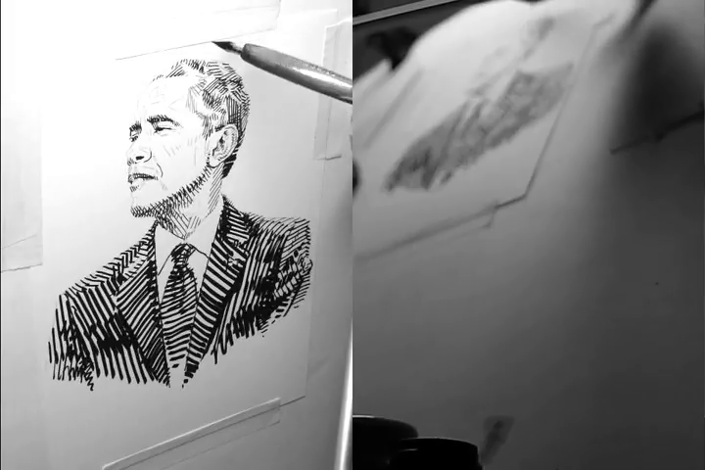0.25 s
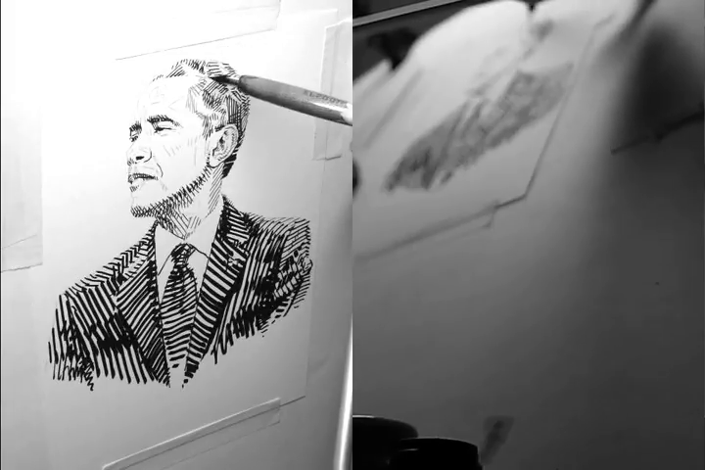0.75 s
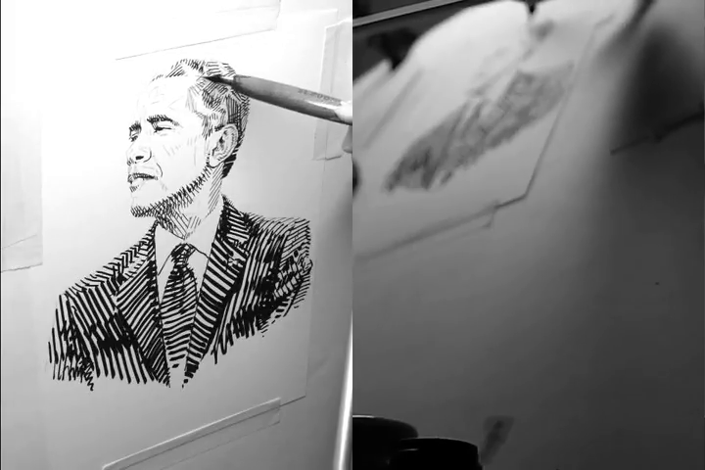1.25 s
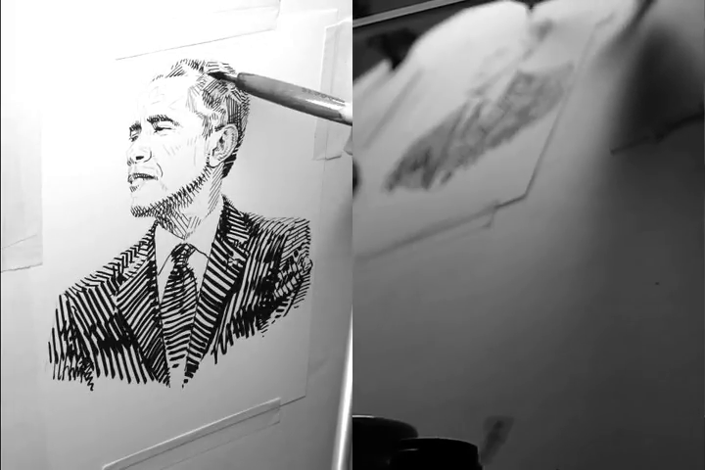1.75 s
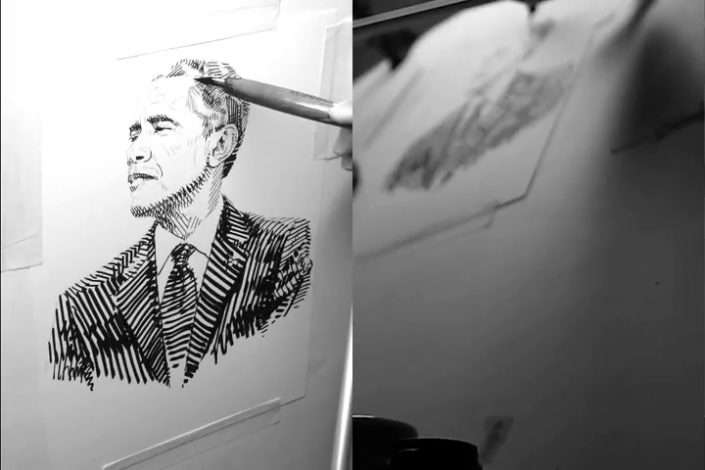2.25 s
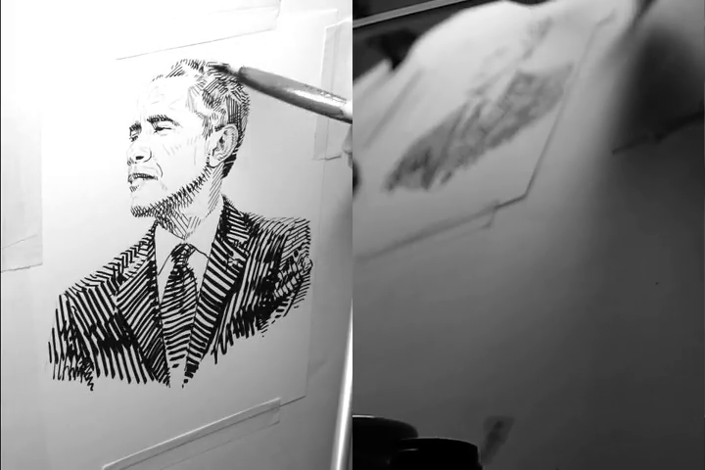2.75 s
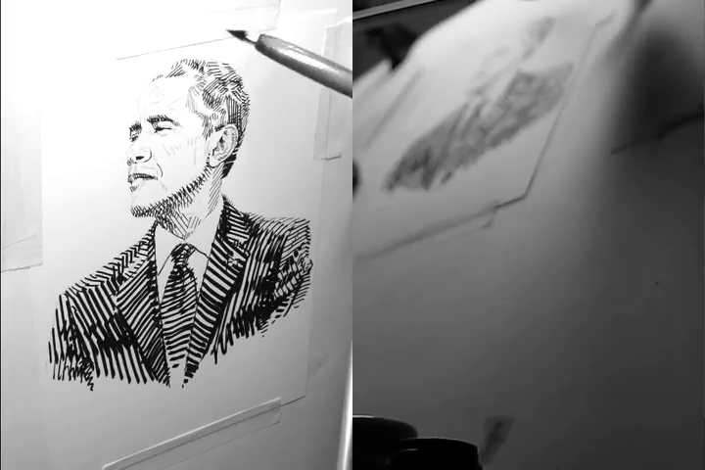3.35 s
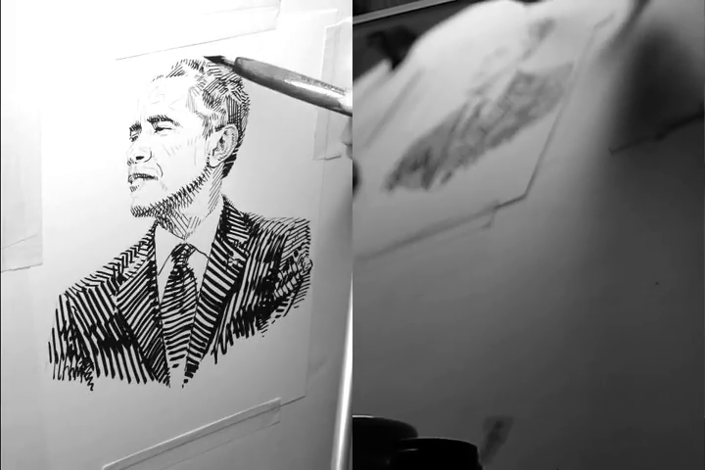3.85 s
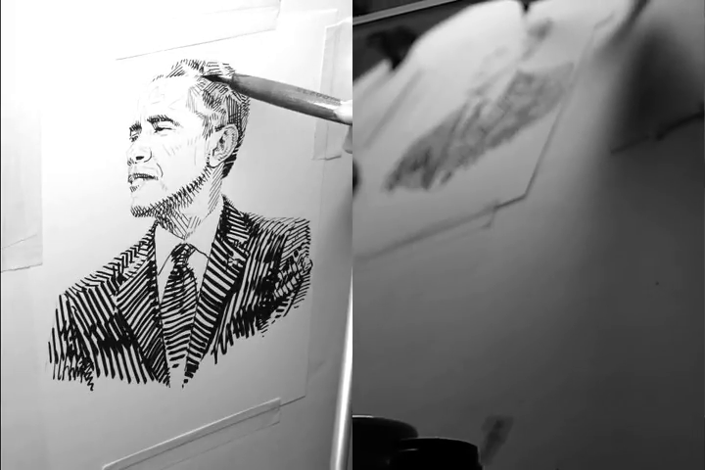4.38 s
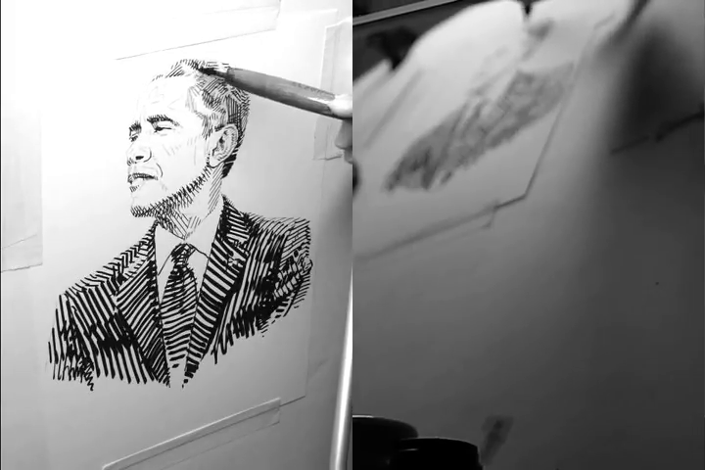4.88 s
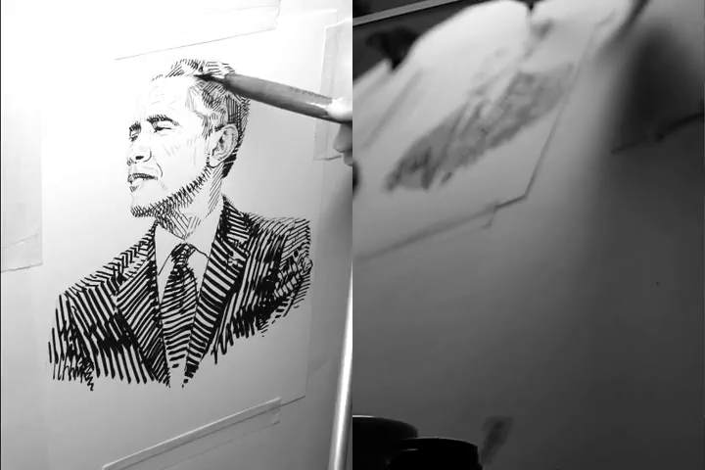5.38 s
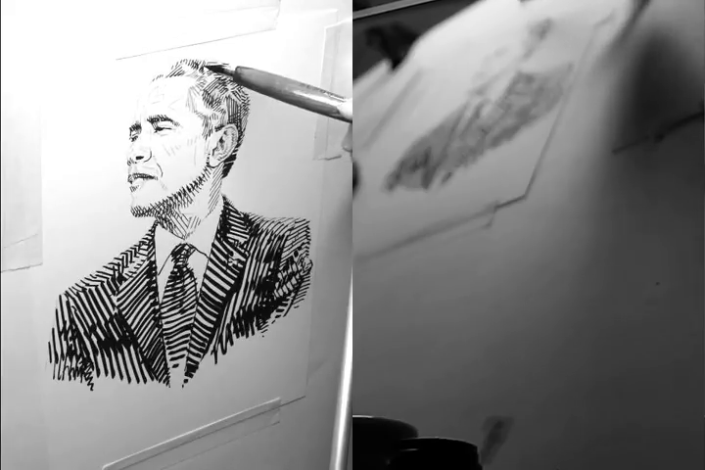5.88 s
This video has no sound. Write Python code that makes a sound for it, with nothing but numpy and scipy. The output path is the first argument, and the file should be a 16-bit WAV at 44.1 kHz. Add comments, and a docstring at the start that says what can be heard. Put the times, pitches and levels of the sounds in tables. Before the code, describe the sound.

In a quiet room, a metal pen nib scratches across paper on a board, heard from nearby. Seven brief strokes come in groups of two, two and three, the middle pair softest, with pauses between. Small dull taps sound as the nib lands, and it sometimes catches on the paper with a tiny tick. Behind it lie a steady hiss, a low electrical hum and a soft rush that fades early on.

```python
"""A low tap, then seven short scratches: a steel dip pen hatches paper taped to a drawing board.
Landing or lifting off, the pen excites the board's modes. The moving nib plucks the paper's fibres:
the board drums low, and the scratch brightens with speed. The sliding hand groans faintly.
Behind the pen, in a quiet room, are a soft rush that fades over the first seconds,
mains hum and an even hiss."""
import sys
import numpy as np
from scipy import signal
from scipy.fft import rfft, irfft, next_fast_len
from scipy.io import wavfile
from scipy.ndimage import map_coordinates

SR = 44100
rng = np.random.default_rng(int(sys.argv[2]) if len(sys.argv) > 2 else 0)


def generate_wav(signal):
    """Clip the signal to [-1, 1] and save it as 16-bit WAV at the path in sys.argv[1]."""
    frames = np.transpose(np.atleast_2d(signal))
    scaled = np.clip(frames, -1, 1) * 32767
    pcm = np.round(scaled).astype(np.int16)
    wavfile.write(sys.argv[1], SR, pcm)


N = 269892


def strokes(drag_swing_db=6.5, scratch_swing_db=15):
    """Friction noise: plucked fibres drive board and nib; speed raises the treble more than the bass."""
    # (start [s], speeding up [s], slowing down [s], peak drag level [dB], peak scratch level [dB])
    hatching = [ (1.063, 0.066, .056, -32.5, -55.5), (1.374, 0.033, .053, -34.5, -54),
                (2.280, 0.021, .068, -38.5, -62.5), (2.517, .026, .050, -40.5, -66),
                (4.679, 0.053, 0.075, -33.5, -54), (5.020, .052, 0.047, -33, -53),
                (5.312, .056, .056, -33.5, -54), ]
    # higher bands follow the scratch more: (low edge [Hz], high edge [Hz], scratch share [0-1], gain [dB])
    sheet_bands = [(55, 119, 0.03, -15), (189, 332, 0, -3.5), (456, 828, 0.23, -2.5), (796, 1930, 0.62, -1)]
    t = np.arange(N) / SR
    touching, drag_db, scratch_db = np.zeros((3, N))
    for start, rise, fall, peak_drag_db, peak_scratch_db in hatching:
        contact, speed = gesture(t, start, rise, fall)
        on = contact > 0
        touching[on] = contact[on]
        drag_db[on] = peak_drag_db - drag_swing_db * (1 - speed[on])
        scratch_db[on] = peak_scratch_db - scratch_swing_db * (1 - speed[on])
    plucks = fibres(per_second=5000, spread_db=3, clump_db=1.67, clump_rate=220)
    rub = board(plucks)
    sheet = np.zeros(N)
    for low, high, share, gain_db in sheet_bands:
        band_db = drag_db + share * (scratch_db - drag_db) + gain_db
        sheet += amp(band_db) * unit(passed(rub, [low, high], "band"))
    return touching * (sheet + amp(scratch_db) * unit(nib(plucks)))


def gesture(t, start, rise, fall, bite_s=0.0052, lift_s=0.012, roundness=1.5):
    """Stroke kinematics: contact and speed, both 0-1, as the nib bites, speeds up, slows and lifts."""
    age = t - start
    contact = np.clip(1 + np.minimum(age / bite_s, (rise + fall - age) / lift_s), 0, 1)
    from_peak = np.clip(np.maximum((rise - age) / rise, (age - rise) / fall), 0, 1)
    return contact, 1 - from_peak ** roundness


def fibres(per_second, spread_db, clump_db, clump_rate):
    """Shot noise: fibres give tiny random impulses, stronger where the paper is rougher."""
    plucked = rng.random(N) < per_second / SR
    sizes = amp(spread_db * rng.standard_normal(N) + clump_db * wobble(clump_rate))
    return plucked * sizes * np.sign(rng.standard_normal(N))


def board(force, lag_s=0.0016, slow_hz=450):
    """Modal resonance with dispersion: low bending waves travel slowly and arrive last."""
    # modes of the board and its sheet: (frequency [Hz], bandwidth [Hz], gain [dB])
    modes = [(77, 29, -10.5), (124, 49, -10), (199.6, 38, -1.5), (227, 35, 0.5), (267, 123, -11.5),
             (282, 12.6, -5), (344, 28, -8), (468, 85, -7), (537, 40, -7), (594.3, 24, -6.5),
             (683, 16, -22), (860, 59, -25), (1030, 32, -44), (1300, 73, -46), (1720, 110, -32.5)]

    def response(f):
        resonance = sum(amp(db) * 1j * f * width / (hz * hz - f * f + 1j * f * width)
                        for hz, width, db in modes)
        dispersion = np.exp(-2j * np.pi * lag_s * slow_hz * np.arctan(f / slow_hz))
        return resonance * dispersion
    return filtered(force, response)


def nib(force):
    """Forced vibration: the steel tines colour a force at the tip with their resonances."""
    # response of the tines: (frequency [Hz], gain [dB])
    tines = [(1200, -14), (2100, 11.5), (2750, -1.5), (3350, 6.5), (4200, 2), (5000, -1.5), (5800, 3.5),
             (6250, 1.5), (6750, 3.5), (7500, -7.5), (8600, -13), (9900, -8.5), (11500, -16.5),
             (15500, -10)]
    return filtered(force, lambda hz: amp(along(tines, hz)))


def taps(thud_db=-2, knock_db=6, tick_below_knock_db=14, thud_spread=1.506, damping_t60=0.11):
    """Impulse excitation: thuds, small knocks and ticks as the pen lands on or lifts off the paper."""
    # (time [s], relative thud level [dB], relative knock level [dB], thud pitch [Hz])
    contacts = [(0.014, -28.5, -57.5, 253), (1.001, -43, -51, 300), (1.063, -52, -48, 260),
                (1.35, -26.5, -43, 225), (2.26, -27.5, -42.5, 235), (2.500, -24, -42.5, 210),
                (2.59, -47, -50, 248), (3.521, -23.5, -54.5, 255), (3.548, -28.5, -79, 226),
                (4.661, -33, -49.5, 253), (4.815, -55, -52, 250), (4.989, -25.5, -44, 225),
                (5.291, -26, -44, 230)]
    track = np.zeros(N)
    t = np.arange(SR // 4) / SR
    ring = board(signal.unit_impulse(len(t))) * amp(-60 * t / damping_t60)  # the resting pen damps it
    knock = peaked(passed(ring, [480, 1450], "band", order=4))
    for s, db, hard_db, hz in contacts:
        # each spot favours its own modes
        thud = peaked(passed(ring, [hz / thud_spread, hz * thud_spread], "band"))
        add(track, s, amp(db + thud_db) * thud + amp(hard_db + knock_db) * knock)
        add(track, s, amp(hard_db + knock_db - tick_below_knock_db) * tick(t60=0.013))
    return track


def snags(gain_db=-2):
    """Stick and slip: the nib catches on a fibre and springs free."""
    # (time [s], relative level [dB])
    releases = [(1.1517, -45), (1.4118, -40), (4.7182, -42), (4.7318, -38), (5.363, -38.5), (5.3761, -38.5)]
    track = np.zeros(N)
    for s, db in releases:
        add(track, s, amp(db + gain_db) * tick(t60=0.01))
    return track


def tick(t60):
    """Transient response: an exponentially decaying burst of force rings the nib."""
    t = np.arange(SR // 20) / SR
    burst = rng.standard_normal(len(t)) * amp(-60 * t / t60)
    return peaked(nib(burst))


def hand(band_hz=(320, 380)):
    """Sliding friction: the side of the hand drags over the sheet with a faint, narrow-band groan."""
    # (middle time [s], duration [s], level [dB])
    slides = [(0.617, 0.14, -63.5), (0.818, 0.076, -59), (4.942, 0.034, -61.5)]
    t = np.arange(N) / SR
    pressure = sum(amp(db) * np.exp(-2 * ((t - s) / length) ** 2) for s, length, db in slides)
    return pressure * unit(passed(rng.standard_normal(N), band_hz, "band", order=2))


def room(x, tail_db=-12.5, gap_s=0.008, echo_db=-10, echo_s=0.01818, echo_top_hz=400):
    """Reverberation and early reflection: a short dull tail, and one wall that returns the low thud."""
    # (frequency [Hz], reverberation time T60 [s])
    decay_times = [(100, 0.26), (300, 0.32), (700, 0.05), (3000, 0.059), (10000, 0.062)]
    hz, t, spectra = signal.stft(rng.standard_normal(SR // 2), SR, nperseg=256)
    decay = amp(-60 * t / along(decay_times, hz)[:, None])
    tail = signal.istft(spectra * decay, SR, nperseg=256)[1]
    wet = np.zeros(N)
    add(wet, gap_s, amp(tail_db) * signal.fftconvolve(x, tail / np.linalg.norm(tail)))
    add(wet, echo_s, amp(echo_db) * passed(x, echo_top_hz, "low"))
    return wet


def rush(start_db=-56.5, sag_db_per_s=0.91, drop_db=4.5, drop_at_s=1.54, drop_width_s=0.33):
    """Amplitude-shaped noise: a soft rush sinks slowly and steps down once, smoothly."""
    # (frequency [Hz], relative spectral density [dB])
    colour = [(30, 14), (90, 6.5), (200, 11.5), (340, 4), (520, 1), (850, 3.5), (1200, 0.5), (1650, -5),
              (2300, -15), (3500, -26.5), (8000, -41)]
    t = np.arange(N) / SR
    dropped = (1 + np.tanh((t - drop_at_s) / drop_width_s)) / 2
    return amp(start_db - sag_db_per_s * t - drop_db * dropped) * noise(colour)


def hum(waver_db=1, waver_rate=3.5):
    """Harmonic series: multiples of the mains frequency, each wavering slightly in level."""
    # (frequency [Hz], rms level [dB])
    harmonics = [(49.8, -59), (99.6, -71), (149.4, -75.5), (249, -73.5)]
    t = np.arange(N) / SR
    track = np.zeros(N)
    for hz, db in harmonics:
        amplitude = np.sqrt(2) * amp(db + waver_db * wobble(waver_rate))
        track += amplitude * np.sin(2 * np.pi * (hz * t + rng.random()))
    return track


def hiss(level_db=-66):
    """Stationary noise: an even hiss lies under everything."""
    # (frequency [Hz], relative spectral density [dB])
    colour = [(20, 19), (60, 30.5), (130, 16), (260, 14.5), (500, 5), (1500, 11.5), (3000, 4.5),
              (6000, 2.5), (10000, 2.5), (16000, 2)]
    return amp(level_db) * noise(colour)


def amp(db):
    """Decibels to amplitude ratio."""
    return 10 ** (np.asarray(db) / 20)


def unit(x):
    """Normalisation to rms 1."""
    return x / np.sqrt(np.mean(x ** 2) + 1e-20)


def peaked(x):
    """Normalisation to peak 1."""
    return x / np.abs(x).max()


def along(points, hz):
    """Interpolation of (frequency [Hz], value) points on a logarithmic axis."""
    f, v = np.transpose(points)
    return np.interp(np.log(hz + 1), np.log(f + 1), v)


def wobble(rate):
    """Smooth random modulation: a spline through rate knots a second."""
    knots = rng.standard_normal(int(N * rate / SR) + 4)
    return map_coordinates(knots, [np.arange(N) * rate / SR])


def filtered(x, response):
    """Linear filtering: the spectrum of x times a frequency response."""
    size = next_fast_len(len(x) + SR // 4)
    hz = np.fft.rfftfreq(size, 1 / SR)
    return irfft(rfft(x, size) * response(hz), size)[:len(x)]


def passed(x, hz, kind, order=3):
    """A causal low-, band- or high-pass filter."""
    return signal.sosfilt(signal.butter(order, hz, kind, fs=SR, output="sos"), x)


def noise(colour):
    """Spectral shaping: noise of rms 1 with the given spectrum."""
    return unit(filtered(rng.standard_normal(N), lambda hz: amp(along(colour, hz))))


def add(track, s, sound):
    """Superposition of a sound on the track at time s."""
    part = track[max(round(s * SR), 0):][:len(sound)]
    part += sound[:len(part)]


def scene():
    """Superposition: the direct sound of pen and hand, its reflections and the background."""
    drawing = strokes() + taps() + snags() + hand()
    return (drawing + room(drawing) + rush() + hum() + hiss())[None]


def record(dry, top_hz=15770):
    """Band limiting: an ideal low-pass filter removes the highest treble."""
    return np.array([filtered(channel, lambda hz: hz < top_hz) for channel in dry])


dry = scene()
out = record(dry)
generate_wav(out)
```